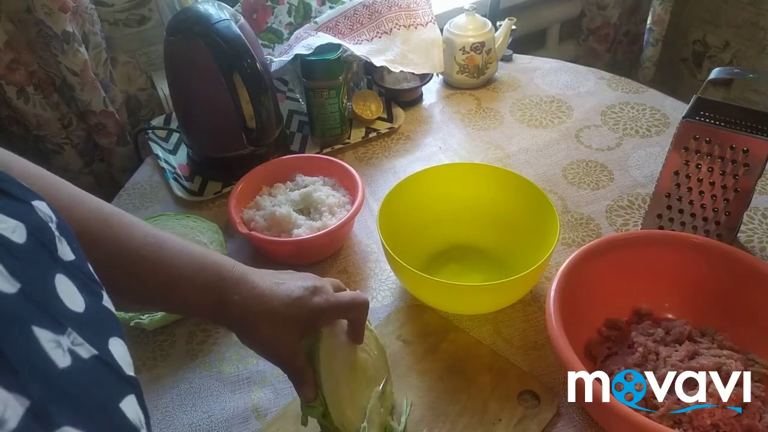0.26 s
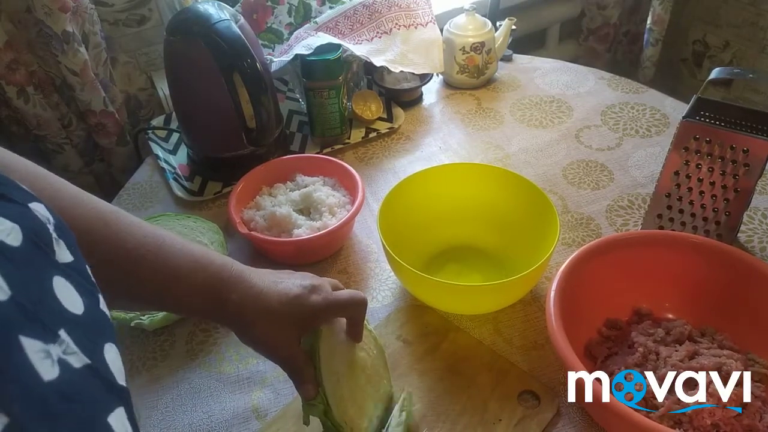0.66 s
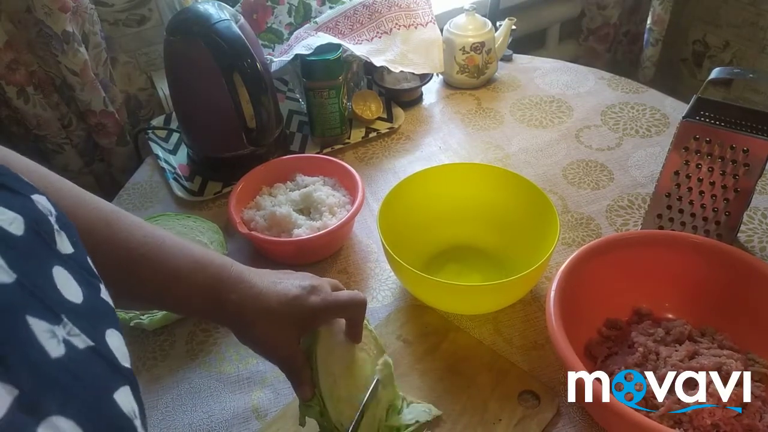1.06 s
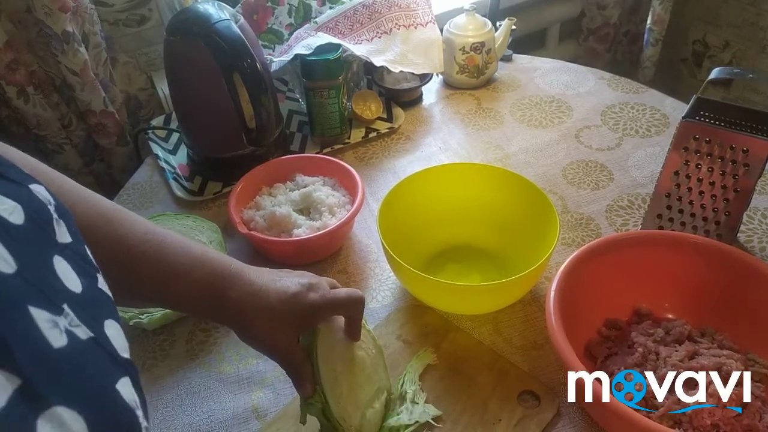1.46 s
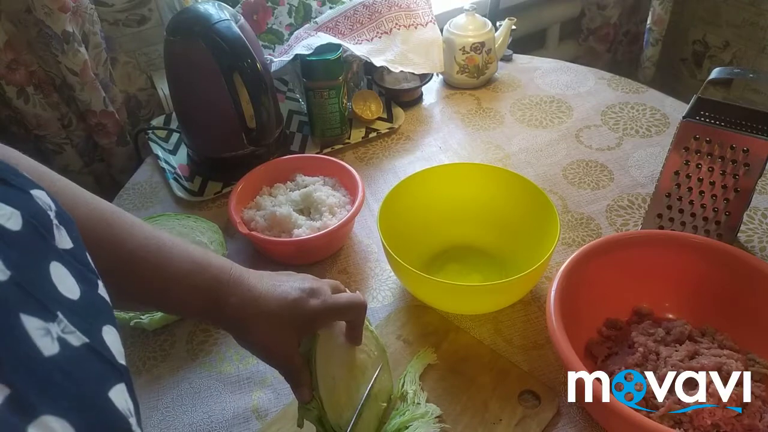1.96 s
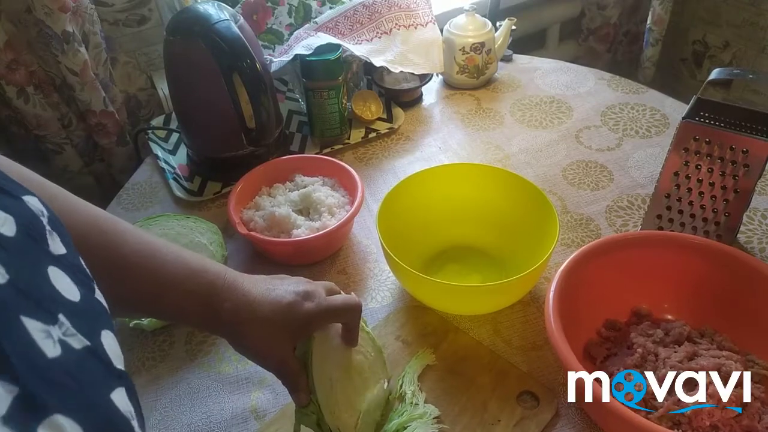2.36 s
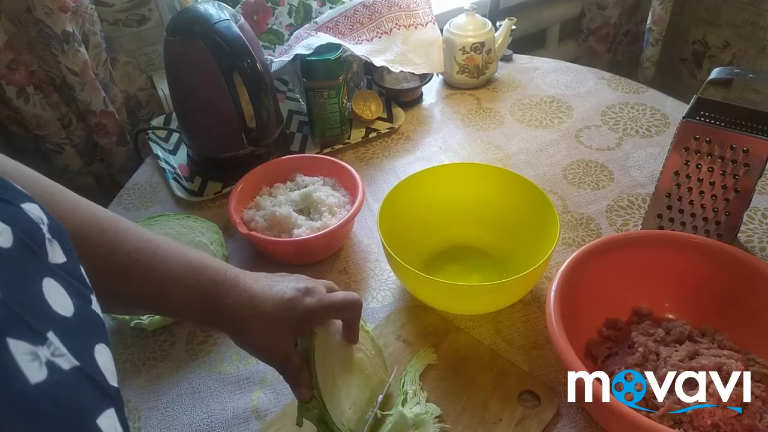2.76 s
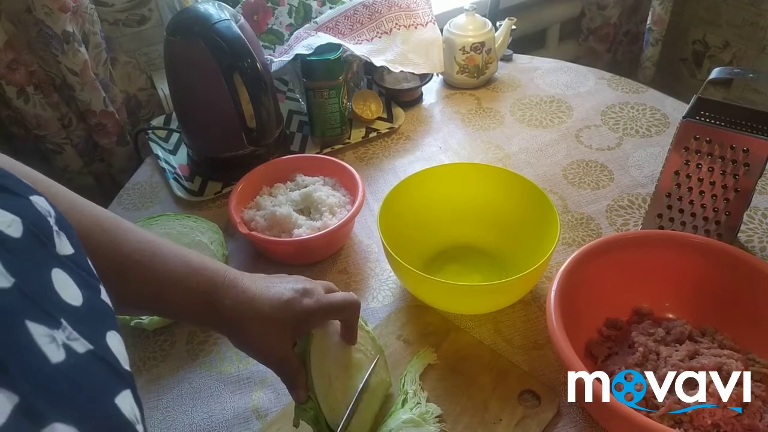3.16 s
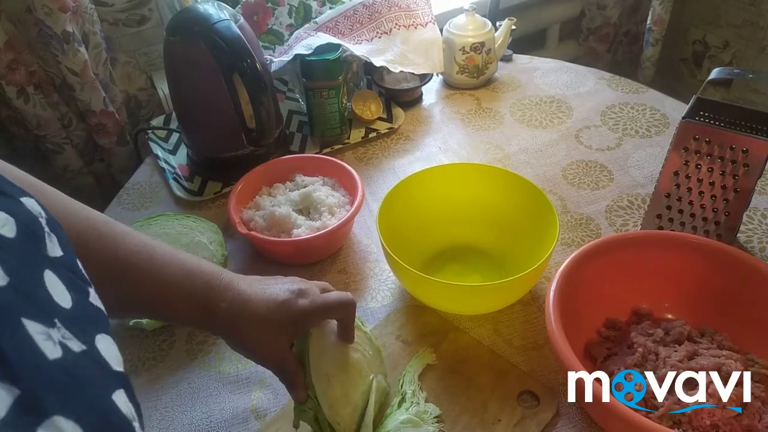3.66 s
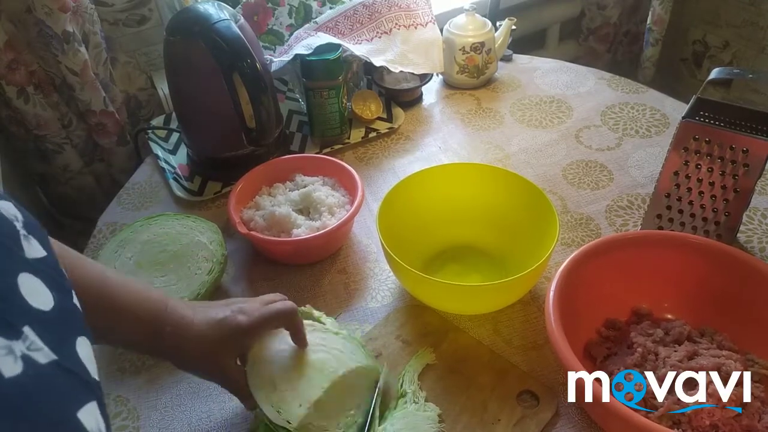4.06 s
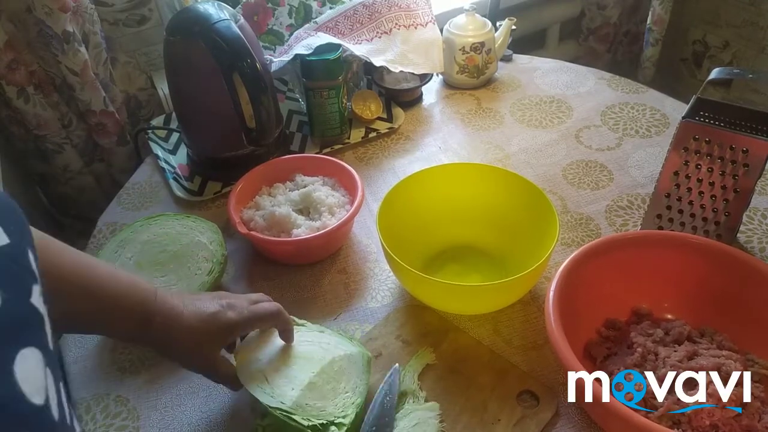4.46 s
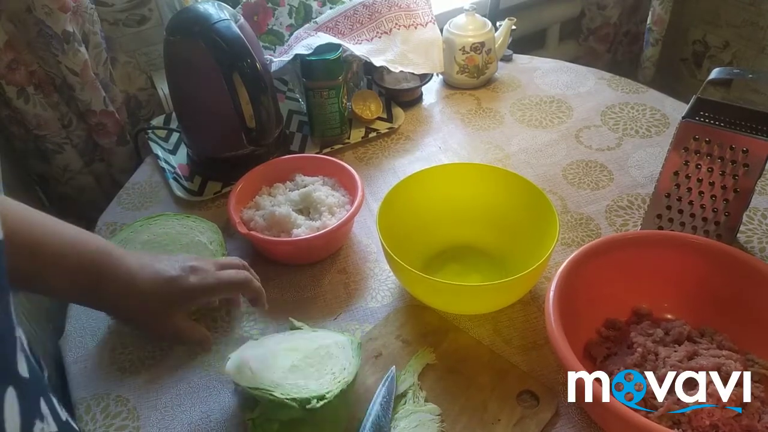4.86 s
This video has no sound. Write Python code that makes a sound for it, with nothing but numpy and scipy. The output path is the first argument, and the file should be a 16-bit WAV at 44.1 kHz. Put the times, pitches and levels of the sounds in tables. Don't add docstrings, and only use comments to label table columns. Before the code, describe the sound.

A knife crunches through a cabbage in four slices on a wooden board, each landing with a knock, then is laid on the table.

```python
import sys
import numpy as np
from scipy import signal
from scipy.fft import rfft, irfft, next_fast_len
from scipy.io import wavfile
from scipy.ndimage import uniform_filter1d, map_coordinates

SR = 44100
rng = np.random.default_rng(int(sys.argv[2]) if len(sys.argv) > 2 else 0)


def persist_wave(psi):
    counts = np.round(np.clip(psi, -1, 1) * 32767).astype(np.int16)
    wavfile.write(sys.argv[1], SR, np.atleast_2d(counts).T)


def invert_db(level):
    return 10 ** (np.asarray(level, dtype=float) / 20)


N = 225640


def unit(x):
    return x / np.sqrt(np.mean(x ** 2) + 1e-20)


def along(points, hz):
    f, v = np.transpose(points)
    return np.interp(np.log(hz + 1), np.log(f + 1), v)


def wobble(rate):
    knots = rng.standard_normal(int(N * rate / SR) + 4)
    return map_coordinates(knots, [np.arange(N) * rate / SR])


def filtered(x, response):
    m = next_fast_len(N + SR // 2)
    return irfft(rfft(x, m) * response(np.fft.rfftfreq(m, 1 / SR)), m)[..., :N]


def modes(table, spread_db=0, damping=1):
    gains = invert_db(rng.normal(0, 1, len(table)) * spread_db)

    def response(f):
        total = 0
        for k, (centre, width, db) in enumerate(table):
            peak = 1j * f * width / (centre * centre - f * f + 1j * f * width * damping)
            total = total + (-1) ** k * gains[k] * invert_db(db) * peak
        return total
    return response


def spread(pair, spectrum, alike):
    def response(hz):
        turn = np.arccos(np.clip(along(alike, hz), -.99, .99)) / 2
        return invert_db(along(spectrum, hz)) * [np.cos(turn), np.sin(turn)]
    mid, side = filtered(pair, response)
    return unit(np.array([mid + side, mid - side]))


def tearing(per_s, size_db, life_s, bed, patchy_db):
    breaks = (rng.random(N) < per_s / SR) * invert_db(size_db * rng.exponential(size=N))
    puffs = signal.lfilter([1], [1, -np.exp(-1 / (life_s * SR))], breaks)
    z = signal.stft((bed + unit(puffs)) * rng.standard_normal((2, N)), nperseg=512)[2]

    def patches(bins):
        across_pitch = uniform_filter1d(rng.standard_normal(z.shape[1:]), size=bins, axis=0)
        return unit(uniform_filter1d(across_pitch, size=5, axis=1))
    colour = patches(10) + 1.7 * patches(2)
    return signal.istft(z * invert_db(patchy_db * colour), nperseg=512)[1][:, :N]


# pitch_hz, level_db (rms)
MOTOR = [(48.4, -59), (145.3, -81), (193.8, -74)]
# pitch_hz, level_db (per Hz)
ROOM_TONE = [(35, -31), (60, 1), (113, -24.5), (136, -3.5), (198, -24), (233, -11), (268, -13.5),
             (417, -17.5), (732, -18), (803, -19.5), (1090, -24), (2350, -25), (2770, -28.5), (3420, -30.5),
             (16000, -33)]
# pitch_hz, left_right_likeness (-1 to 1)
ROOM_TONE_ALIKE = [(60, 0.32), (180, 0.92), (550, 0.22), (1650, -0.4), (4970, -0.27), (15000, 0.08)]
# pitch_hz, width_hz, level_db
PIPES = [(2486, 60, -80), (3340, 180, -79), (4300, 280, -81)]


def fridge():
    turn = 2 * np.pi * np.cumsum(1 + .004 * wobble(3)) / SR
    lines = 0
    for hz, db in MOTOR:
        lines = lines + np.sqrt(2) * invert_db(db + 1.5 * wobble(3.8)) * np.sin(hz * turn)
    air = tearing(46, size_db=-3.5, life_s=.01, bed=8, patchy_db=1.4)
    air = invert_db(-64 + 0.49 * wobble(1.2)) * spread(air, ROOM_TONE, ROOM_TONE_ALIKE)
    pipes = invert_db(21.5 + 2.0 * wobble(11.0)) * filtered(rng.standard_normal((2, N)), modes(PIPES))
    return lines * invert_db([[.4], [-.4]]) + air + pipes


def rubbing(rows, crunch_db, fizz_db, table_db, rounded):
    t, total = np.arange(N) / SR, 0
    for peak_s, db, rise, fall, board_db in rows:
        below_db = np.where(t < peak_s, rise * (peak_s - t), fall * (t - peak_s))
        shape = invert_db(db - 20 * (below_db / 20) ** rounded)
        parts_db = np.array([[0], [crunch_db], [fizz_db], [board_db], [board_db + table_db]])
        total = total + shape * invert_db(parts_db)
    return total


# peak_s, crackle_db, rise_db_per_s, fall_db_per_s, board_over_crackle_db
SHIFTS = [(0.002, -66, 300, 158, 9.5), (0.143, -67.5, 900, 96, -16), (0.782, -60.5, 402.5, 346, -3),
          (0.588, -62.5, 901.5, 151.5, -5.5), (0.962, -65.5, 596.5, 40, -4), (1.6, -75, 200, 100, 16.5),
          (1.74, -71.5, 59.5, 150, -4), (1.83, -73, 901, 11.5, -8), (2.66, -62, 799, 254, 10),
          (2.748, -70.5, 900, 450, -1.5), (3.002, -73, 899.5, 14, -3), (3.21, -71.5, 500, 39, 14),
          (3.95, -65, 109, 203, 3.5), (4.09, -69, 100, 60, -6), (4.28, -80.5, 406, 34.5, 11),
          (4.36, -75.5, 59, 197, -4), (4.64, -80, 192, 201, 12), (4.69, -68, 73, 43.5, -16),
          (4.888, -80.5, 808, 151, 5), (5.018, -64.5, 280, 52, 2)]


def rustling():
    return rubbing(SHIFTS, crunch_db=-5, fizz_db=-2.5, table_db=-3.5, rounded=0.7)


# pitch_hz, level_db (per Hz)
CRACKLE_COLOUR = [(1470, -46.5), (2500, -24), (3250, -1), (3840, -3), (4520, -1), (5840, -1.5), (6830, 0),
                  (9500, 0), (12400, -21), (20900, -120)]
# pitch_hz, level_db (per Hz)
CRUNCH_COLOUR = [(600, -9), (1000, -5), (1700, -5.5), (2500, -5), (3200, -10.5), (5000, -31)]
# pitch_hz, level_db (per Hz)
FIZZ_COLOUR = [(6000, -35), (8500, -8), (10000, -1.5), (12000, -1.5), (14000, -4.5), (15500, -5.5)]
# pitch_hz, left_right_likeness (-1 to 1)
CUT_ALIKE = [(60, 0.46), (150, 1), (380, 1), (950, 0.43), (2380, 0.48), (5980, -0.26), (15000, -0.078)]
# pitch_hz, width_hz, level_db
BOARD_MODES = [(276.6, 9.4, -7), (328.6, 17.4, 1.5), (379.6, 19.5, -1), (424.2, 23.3, -1), (462, 36, -9),
               (493.4, 23, -8), (572, 30.4, -3.5), (658, 41, -7.5), (754.6, 48, -11), (851, 18, -5.5),
               (1024, 41, -12)]
# pitch_hz, width_hz, level_db
TABLE_MODES = [(93, 7.8, -1), (123, 30, 3), (148.7, 11, 6.5), (231.3, 36, -2.5)]


def cutting():
    force = slicing() + scraping() + rustling()
    layers = invert_db(1.07 * wobble(30.25) + 1.25 * wobble(90))
    crackle = tearing(1500, size_db=2.0, life_s=0.00022, bed=2.0, patchy_db=1.0)
    crackle = spread(crackle, CRACKLE_COLOUR, CUT_ALIKE)
    fizz = tearing(2000, size_db=2.5, life_s=0.00008, bed=1.6, patchy_db=0.0)
    fizz = spread(fizz, FIZZ_COLOUR, CUT_ALIKE)
    crunch = tearing(540, size_db=3.5, life_s=0.00026, bed=5.7, patchy_db=1.0)
    crunch = spread(crunch, CRUNCH_COLOUR, CUT_ALIKE)
    shake = tearing(200, size_db=1.5, life_s=0.0018, bed=0.74, patchy_db=1.43)
    board = unit(filtered(shake[0], modes(BOARD_MODES)))
    table = unit(filtered(shake[1], modes(TABLE_MODES)))
    leaves = invert_db(0.4) * (force[0] * crackle + force[1] * crunch + force[2] * fizz)
    wood = invert_db(-4.0) * force[3] * board + invert_db(-3.5) * force[4] * table
    return layers * (leaves + wood)


# pitch_hz, left_over_right_db
BOARD_LEAN = [(60, -1), (180, -0.5), (550, -1.5), (1650, -1), (4970, 2), (15000, 7)]


def leaning(x):
    return filtered(x, lambda hz: invert_db(along(BOARD_LEAN, hz) * np.array([[.5], [-.5]])))


# pitch_hz, t60_s
ROOM_T60 = [(150, 0.27), (1000, 0.21), (4000, 0.25), (12000, 0.079)]
# pitch_hz, left_right_likeness (-1 to 1)
ANSWER_ALIKE = [(100, 0.98), (400, 0.91), (1000, .3), (3000, 0.057)]


def kitchen(x):
    noise = spread(rng.standard_normal((2, N)), [(1000, 0)], ANSWER_ALIKE)[:, :SR // 2]
    hz, t, z = signal.stft(noise, SR, nperseg=256)
    tail = signal.istft(z * invert_db(-60 * t / along(ROOM_T60, hz)[:, None]), SR, nperseg=256)[1]
    late = np.pad(x, (250, 0))[None]
    return signal.fftconvolve(late, tail / np.linalg.norm(tail[0]), axes=1)[:, :N]


# start_s, level_db (peak), pitch_hz, left_over_right_db
LEAF_SNAPS = [(0.14, -50, 9200, 10), (0.4632, -24, 2400, 15), (0.5876, -46, 3300, 2.5),
              (0.9632, -38.5, 13000, -0.5), (0.9983, -45.5, 7870, 3), (1.3193, -26, 3220, 6.5),
              (1.494, -42, 3380, -2), (1.653, -47, 2510, -1), (1.729, -45, 13000, 2.5),
              (1.8407, -51, 6260, -9), (2.0156, -43, 9450, 3.5), (2.0847, -34, 11900, 15.5),
              (2.2328, -22, 9820, -10.5), (2.2926, -15.5, 5200, 2), (2.4786, -48, 2540, 17),
              (2.6556, -48, 5160, 2), (2.744, -48.5, 11200, 0.5), (3.001, -44.5, 12900, 10),
              (3.5442, -16.5, 8600, 9), (4.0217, -46, 8370, 6.5), (4.0334, -53, 8780, 3.5),
              (4.0482, -43, 8600, 4), (4.0803, -46, 9080, -0.5), (4.1145, -46, 10600, 4.5),
              (4.52, -39.5, 9830, 4), (4.8848, -38, 12200, -10), (5.012, -43.5, 6310, -11),
              (5.0394, -50, 4720, -14), (5.097, -43.5, 2300, -9)]


def snaps():
    out, t = np.zeros((2, N + SR)), np.arange(SR // 50) / SR
    for s, db, hz, pan_db in LEAF_SNAPS:
        noise = rng.standard_normal(len(t)) + 0.44 * rng.standard_normal((2, len(t)))
        burst = noise * invert_db(-60 * t / 0.0048)
        band = signal.iirpeak(hz, 1.4, SR)
        click = signal.lfilter(*band, signal.lfilter(*band, burst))
        level = invert_db(db - 2.0 + pan_db * np.array([[.5], [-.5]]))
        start = round(s * SR)
        out[:, start:start + len(t)] += level * click / np.abs(click).max()
    return out[:, :N]


# start_s (blade enters), land_s, crackle_db (at landing), swell_power,
# fizz_db (wet, at entry)
CUTS = [
    (0.193, 0.464, -34.5, 2.08, 2),
    (1.035, 1.329, -36.5, 1.55, 4),
    (1.956, 2.292, -37, 1.69, 6.5),
    (2.988, 3.551, -38, 2.74, 15.5),
]


def slicing():
    t, out = np.arange(N) / SR, 0
    for enter, land, db, power, fizz_in_db in CUTS:
        depth = np.clip((t - enter) / (land - enter), 1e-4, 1)
        since, landed = np.maximum(t - land, 0), t > land
        swell_db = 20 * power * np.log10(depth)
        burst_db = 7.5 * np.exp(np.minimum(t - land, 0) / 0.0099)
        crackle_db = np.where(landed, -7.5 - 202 * since, swell_db + burst_db)
        crunch_db = np.where(landed, -1, -8.5 + (-2 + 8.5) * depth)
        fizz_db = np.where(landed, 0.3 - 60.5 * since, fizz_in_db + (-0.3 - fizz_in_db) * depth)
        board_db = 1 + 1.57 * swell_db - 192 * since
        table_db = -19 + .45 * swell_db - 900 * since
        out = out + invert_db(db + np.array([crackle_db, crackle_db + crunch_db, crackle_db + fizz_db,
                                       board_db, table_db]))
    return out


# start_s, level_db (peak), hard_contact_db, contact_ms
BOARD_BLOWS = [(0.349, -41, 5, 0.66), (0.395, -25, -2.5, 0.52), (0.465, -14.5, 4, 0.5),
               (0.482, -22, -27.5, 0.28), (0.494, -26, -33, 0.37), (0.636, -41, 5, 0.18),
               (0.749, -37.5, -27.5, 3.1), (1.151, -44.5, 5.5, 0.5), (1.28, -38, 2, 1.3),
               (1.317, -19, -10, 0.45), (1.328, -14.5, -5.5, 0.21), (1.35, -24, -30, 0.33),
               (1.613, -44, -20.5, 1), (2.174, -36, -9, 0.84), (2.269, -22.5, -1, 1.9),
               (2.294, -19.5, -17, 0.79), (2.317, -40, -29, 0.75), (2.46, -62, 0, 0.5),
               (2.656, -47, 2, 1.3), (3.21, -39, -28, 0.98), (3.511, -21, -7, 1.2), (3.536, -31, -10, 0.8),
               (3.547, -32, 9.5, 0.37), (4.044, -44, -11, 2.2), (4.084, -38, -32, 3),
               (5.011, -46.5, -9, 0.66), (5.039, -48, -17, 1.2), (5.094, -45, -15, 1.6)]
# pitch_hz, width_hz, level_db
HARD_MODES = [(970, 300, -1.5), (1373, 44, -16), (1654, 130, 2.5), (1810, 35, -4.5), (1920, 280, 2.5),
              (2420, 160, -47.5)]


def blows():
    out, size = np.zeros(N + SR), SR // 2
    t, hz = np.arange(size) / SR, np.fft.rfftfreq(size, 1 / SR)

    def ring(push, body):
        held = modes(body, spread_db=3, damping=1.31)
        return irfft(push * held(hz))

    for s, db, hard_db, contact_ms in BOARD_BLOWS:
        push = rfft(t * np.exp(-t / (contact_ms * 0.00027 + 1e-5)))
        board, thud = ring(push, BOARD_MODES), ring(push, TABLE_MODES)
        hard = ring(push, HARD_MODES) * (1 - np.exp(-t / 0.0024))
        board, hard, thud = [-r / np.abs(r).max() for r in (board, hard, thud)]
        hit = invert_db(db - 6) * (board + invert_db(hard_db + 3.5) * hard)
        thud_db = -53.5 + 0.4 * (db + 37.5)
        out[round(s * SR):][:size] += hit + invert_db(thud_db) * thud
    return out[:N]


# peak_s, crackle_db, rise_db_per_s, fall_db_per_s, board_over_crackle_db
DRAWS_BACK = [
    (0.655, -49.5, 195, 240, 4),
    (1.5, -49, 187, 183, -2.5),
    (2.49, -44.5, 306, 203, -5),
    (3.772, -44.5, 222, 207, -7),
]


def scraping():
    return rubbing(DRAWS_BACK, crunch_db=0.5, fizz_db=-2, table_db=-24.5, rounded=1.44)


# start_s, level_db (peak), clack_over_peak_db
KNIFE_DOWN = [
    (4.4092, -24.5, -6),
    (4.433, -31, -37),
    (4.462, -35.5, -12.5),
    (4.6, -49, -19),
]
# pitch_hz, width_hz, level_db
STRUCK_MODES = [(91, 26, -5), (148, 25, 2.5), (223, 27, -1), (185, 32, -5), (250, 28, -2),
                (293.5, 18.6, 6.5), (348.3, 20.7, 3), (480, 72, -6), (625, 25, -13), (691, 13, -8.5),
                (883, 100, -9), (1420, 47, -30), (1730, 77, -13), (2190, 220, -29)]
# pitch_hz, level_db (per Hz)
CLACK_COLOUR = [(500, 5), (1200, 7.5), (2200, 7.5), (4000, 0), (5500, -3), (8000, -19), (11000, -33),
                (15000, -42)]


def knock():
    pushes, rattle, t = np.zeros(N), np.zeros(N + SR), np.arange(SR // 4) / SR
    decay = invert_db(-60 * t / 0.016) + 0.08 * invert_db(-60 * t / 0.11)
    for s, db, clack_db in KNIFE_DOWN:
        pushes[round(s * SR)] = invert_db(db + 39.5)
        rattle[round(s * SR):][:len(t)] += invert_db(db + clack_db) * decay
    clack = rattle[:N] * spread(rng.standard_normal((2, N)), CLACK_COLOUR, [(1000, 0.53)])
    ring = modes(STRUCK_MODES)
    soft = filtered(pushes, lambda hz: ring(hz) / (1 + 1j * hz / 900))
    return soft + clack * invert_db([[-.8], [.8]])


def scene():
    cut = leaning(cutting())
    hits = leaning(blows()) + snaps()
    knife = knock()
    to_room = invert_db(-6.5) * cut[0] + invert_db(-8.5) * hits[0] + invert_db(-4.5) * knife[0]
    return cut + hits + knife + kitchen(to_room) + fridge()


def roll_off(x):
    return signal.sosfilt(signal.butter(12, 15830, fs=SR, output="sos"), x)


def record(dry):
    heard = filtered(dry, lambda hz: (hz < 15830) * (1j * hz / (38 + 1j * hz)) ** 2)
    return roll_off(heard)


dry = scene()
out = record(dry)
persist_wave(out)
```